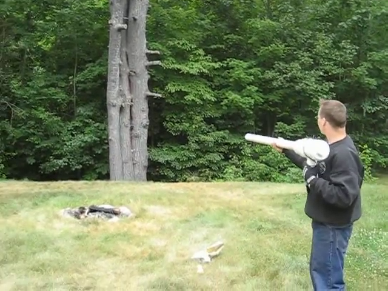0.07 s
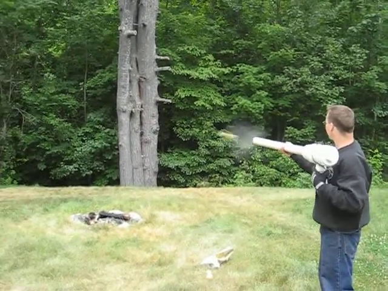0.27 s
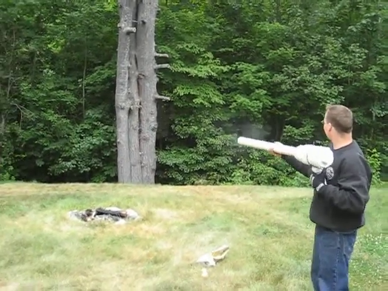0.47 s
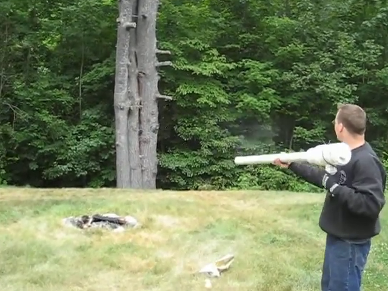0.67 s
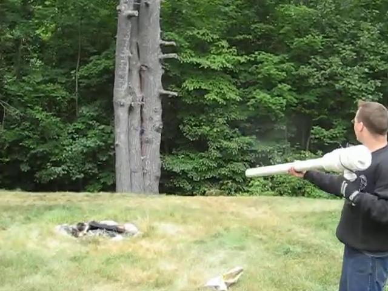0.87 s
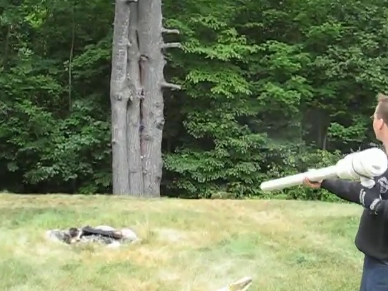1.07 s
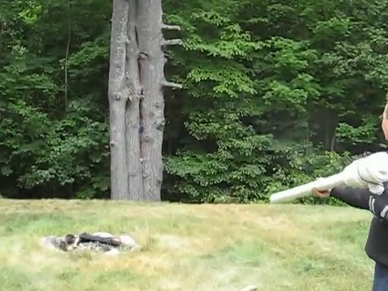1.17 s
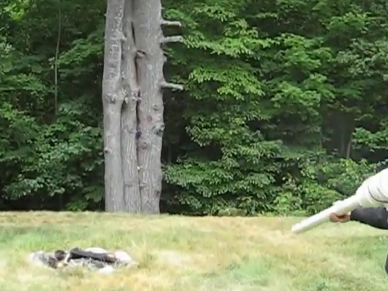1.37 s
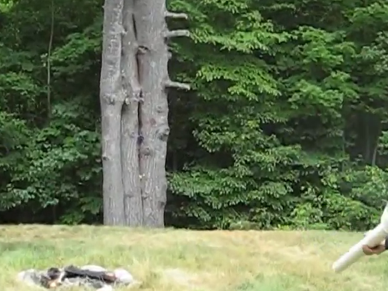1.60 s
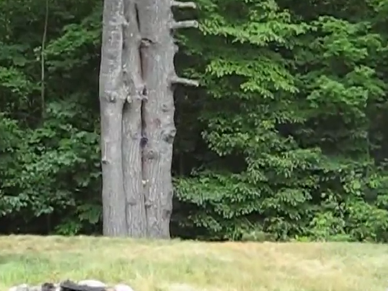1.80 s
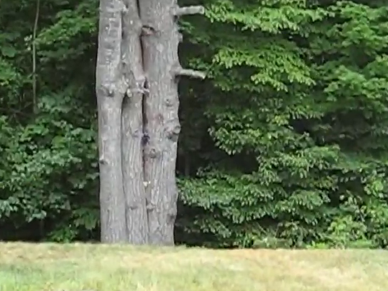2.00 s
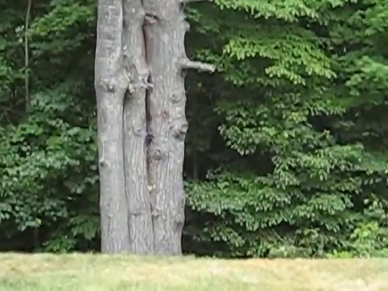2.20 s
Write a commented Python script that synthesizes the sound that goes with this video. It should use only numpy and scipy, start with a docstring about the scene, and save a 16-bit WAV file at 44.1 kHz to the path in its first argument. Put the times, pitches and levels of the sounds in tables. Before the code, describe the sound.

A pipe launcher fires with one sharp pop, then a smack and a rolling echo.

```python
"""Potato launcher at the edge of a wood

A pipe launcher is fired across a lawn, heard on a small camera's microphone over a steady hush.
The igniter snaps, gas hisses out and bursts from the muzzle, and the potato smacks into a tree.
The near trees throw the shot back, then it rolls away through the wood."""
import sys
import numpy as np
from scipy import signal
from scipy.fft import rfft, irfft
from scipy.io import wavfile
from scipy.ndimage import uniform_filter1d

SR = 44100
rng = np.random.default_rng(int(sys.argv[2]) if len(sys.argv) > 2 else 0)


def int16_out(signal):
    """Quantize to a 16-bit WAV file."""
    q = np.round(np.clip(np.atleast_2d(signal).T, -1, 1) * 32767)
    wavfile.write(sys.argv[1], SR, q.astype(np.int16))


N = 99225
T = np.arange(N) / SR
FREQ_HZ = np.fft.rfftfreq(N, 1 / SR)
CAMERA_CUTOFF_HZ = 5840
PIPE_IN_JET_DB, PIPE_IN_ECHO_DB = -3, -9.5


def amp(db):
    """Decibels to gain."""
    return 10 ** (np.asarray(db) / 20)


def unit(x):
    """Scales to rms 1."""
    return x / np.sqrt(np.mean(x ** 2) + 1e-20)


def curve_at(points, hz):
    """Interpolates a table along a log-frequency axis."""
    freq_hz, value = np.transpose(points)
    return np.interp(np.log(hz + 1), np.log(freq_hz + 1), value)


def octaves(hz):
    """Octaves from 1 kHz, held constant below 200 Hz."""
    return np.log2(np.maximum(hz, 200) / 1000)


def colour(spectrum, hz, tilt):
    """Gain of a spectrum tilted in dB per octave, dying away above the camera's band."""
    return amp(curve_at(spectrum, hz) + tilt * octaves(hz)) / (1 + (hz / 6500) ** 16)


def resonance(pitch_hz, width_hz):
    """Gain of one resonant peak across the spectrum."""
    return 1 / (1 + (2 * (FREQ_HZ - pitch_hz) / width_hz) ** 2)


# Resonances of the launcher's pipe: pitch_hz, width_hz, level_db
PIPE_RESONANCES = [(270, 40, 2), (352, 46, -1), (630, 57, -1), (715, 58, -8), (1087, 55, -2),
                   (1300, 33, -4), (1940, 94, -4.5), (2230, 120, -2.5), (2970, 220, 0.5)]
def noise(spectrum, tilt=0, pipe_db=-100):
    """Coloured noise of rms 1, optionally carrying the resonances of the pipe."""
    pipe = 1 + amp(pipe_db) * sum(amp(db) * resonance(hz, width) for hz, width, db in PIPE_RESONANCES)
    return unit(irfft(rfft(rng.standard_normal(N)) * colour(spectrum, FREQ_HZ, tilt) * pipe, N))


def decay(age_s, t60_s):
    """Exponential fall of 60 dB every t60_s."""
    return np.exp(-np.log(1000) * age_s / t60_s)


def envelope(start_s, rise_s, hold_s, t60_s):
    """Quadratic rise, hold and exponential release."""
    t = T - start_s
    return np.clip(t / rise_s, 0, 1) ** 2 * decay(np.maximum(t - rise_s - hold_s, 0), t60_s)


def ring(modes, start_s, rise_s=1 / SR):
    """Damped modes (pitch_hz, level_db, t60_s) set going at one moment."""
    t = np.maximum(T - start_s, 0)
    tones = sum(amp(db) * decay(t, t60_s) * np.sin(2 * np.pi * hz * t) for hz, db, t60_s in modes)
    return np.minimum(t / rise_s, 1) * tones


def crack(spectrum, start_s, tilt, smear_s, size=4096):
    """One coloured pulse of energy 1, its treble trailing by smear_s at the camera's cutoff."""
    hz = np.fft.fftfreq(size, 1 / SR)
    log_gain = np.log(colour(spectrum, abs(hz), tilt) + 1e-4)
    log_minimum_phase = np.conj(signal.hilbert(log_gain))
    phase_lag = np.pi * smear_s * hz * abs(hz) / CAMERA_CUTOFF_HZ
    pulse = np.fft.ifft(np.exp(log_minimum_phase - 1j * phase_lag)).real
    return np.interp(T - start_s, np.arange(size) / SR, pulse / np.linalg.norm(pulse), 0, 0)


# Open air over the lawn, with microphone hiss: freq_hz, level_db
HUSH_SPECTRUM = [(20, -13), (40, 0), (70, -0.5), (160, -1.5), (198, -1), (260, -4.5), (380, -4.5),
                 (500, -9.5), (680, -6), (1200, -9.5), (1600, -14.5), (2900, -17.5), (4500, -18.5),
                 (5500, -24.5)]
# Faint hum behind the hush: pitch_hz, width_hz, level_db
HUM_BANDS = [(196.9, 8, -59)]
# Soft low bumps right on the microphone: start_s, length_s, pitch_hz, level_db
MIC_BUMPS = [(0.136, 0.029, 133, -35), (1.166, 0.13, 50.5, -38.5), (2.1, 0.15, 72.8, -46.5)]
def background():
    """A steady hush and a faint, wavering hum, with a few bumps on the microphone."""
    out = amp(-45) * noise(HUSH_SPECTRUM)
    for hz, width_hz, db in HUM_BANDS:
        out += amp(db) * unit(irfft(rfft(rng.standard_normal(N)) * resonance(hz, width_hz), N))
    for start_s, length_s, hz, db in MIC_BUMPS:
        t = T - start_s
        swell = np.sin(np.pi * np.clip(t / length_s, 0, 1)) ** 2
        out += amp(db) * swell * np.sin(2 * np.pi * hz * t)
    return out


# Rustle just before the shot: freq_hz, level_db
RUSTLE_SPECTRUM = [(40, -14), (100, -2), (170, 1), (250, -9.5), (400, -7.5), (550, -25), (2000, -33)]
def rustle():
    """A soft low rustle grows until the trigger is pressed."""
    swell = envelope(start_s=-0.15, rise_s=0.3, hold_s=0.074, t60_s=0.033)
    return amp(-45.5) * swell * noise(RUSTLE_SPECTRUM)


# Distant echo from deep in the wood: freq_hz, level_db
DEEP_WOOD_SPECTRUM = [(25, -5), (45, -1), (100, -20), (175, -17), (216, -16.5), (251, -19.5), (334, -7.5),
                      (500, -11.5), (622, -2.5), (761, -0.5), (850, -6.5), (1050, -4), (1280, -4.5),
                      (1460, -9.5), (1750, -13.5), (1980, -7.5), (2200, -13.5), (2380, -12.5), (2770, -17),
                      (4000, -24), (5500, -33.5)]
# How long it lingers among the trees: freq_hz, t60_s
DEEP_WOOD_DECAY = [(50, 1.8), (250, 3.2), (700, 2.92), (1300, 2.18), (2000, 1.7), (3000, 1.05), (5500, 1.1)]
def deep_wood():
    """Countless trunks scatter the shot: the echo swells, dulls and rolls away in patches."""
    start_s, rise_s, peak_s = 0.404, 0.11, 0.69
    swell_db_per_s, dulling_db_per_octave_s, patchy_db = 27, 15, 0.95
    wash = noise(DEEP_WOOD_SPECTRUM, pipe_db=PIPE_IN_ECHO_DB)
    hz, t, bands = signal.stft(wash, SR, nperseg=512, noverlap=384)
    hz = hz[:, None]
    before_peak_s, after_peak_s = np.maximum(peak_s - t, 0), np.maximum(t - peak_s, 0)
    patches = uniform_filter1d(rng.standard_normal(bands.shape), size=7, axis=0)
    patches = unit(uniform_filter1d(patches, size=6, axis=1))
    swell_db = before_peak_s * (dulling_db_per_octave_s * np.maximum(octaves(hz), 0) - swell_db_per_s)
    bands *= amp(swell_db + patchy_db * patches) * decay(after_peak_s, curve_at(DEEP_WOOD_DECAY, hz))
    echo = signal.istft(bands, SR, nperseg=512, noverlap=384)[1][:N]
    return amp(-29.5) * np.clip((T - start_s) / rise_s, 0, 1) * echo


# Nearer echo from the tree line across the lawn: freq_hz, level_db
WOOD_EDGE_SPECTRUM = [(35, 9), (60, -18), (90, 3), (135, -5.5), (210, -4), (310, -3.5), (520, -7),
                      (760, 2.5), (1050, -3.5), (1300, 0.5), (1650, -13), (2000, -5), (2600, -8),
                      (3000, -10.5), (4000, -13.5), (5500, -22)]
def wood_edge():
    """The first row of trees returns a dense echo."""
    swell = envelope(start_s=0.3336, rise_s=0.036, hold_s=0.099, t60_s=0.12)
    return amp(-25) * swell * noise(WOOD_EDGE_SPECTRUM, pipe_db=PIPE_IN_ECHO_DB)


# The potato's hit on a tree across the lawn, then its rebound striking something else: start_s, level_db,
# tilt_db_per_octave, knock_db, clack_hz, clack_db
POTATO_STRIKES = [(.4770, 0, 2.5, -11, 3110, -20), (0.5107, -10, -2.2, -34, 1740, -13)]
# The smack as it reaches the microphone: freq_hz, level_db
SMACK_SPECTRUM = [(100, 1.5), (400, 1.5), (700, 7), (1100, 14), (1550, 5), (1900, 5), (2250, 10.5),
                  (2550, -15), (3100, 7.5), (3500, 3.5), (3900, -15), (5100, -6), (6000, -33)]
# Hollow knock of the trunk: pitch_hz, level_db, t60_s
TRUNK_MODES = [(650, -2, 0.041), (788, 3, .028), (1080, -6, 0.016)]
def potato_hits():
    """Each hit is a hard smack with a brief clack, a short wet spray and a knock of the wood."""
    smear_s, clack_t60_s, knock_delay_s = 0.000735, 0.016, 0.0038
    out = np.zeros(N)
    for start_s, db, tilt, knock_db, clack_hz, clack_db in POTATO_STRIKES:
        smack = amp(9.5) * crack(SMACK_SPECTRUM, start_s, tilt, smear_s)
        clack = ring([(clack_hz, clack_db, clack_t60_s)], start_s, rise_s=smear_s)
        spray = amp(-25) * noise(SMACK_SPECTRUM, tilt)
        spray *= envelope(start_s, rise_s=0.00053, hold_s=0, t60_s=0.032)
        knock = ring(TRUNK_MODES, start_s + knock_delay_s, rise_s=0.0025)
        out += amp(db) * (smack + clack + spray) + amp(knock_db) * knock
    return out


# Trigger snaps at the launcher: start_s, level_db
TRIGGER_SNAPS = [(0.2241, -20), (0.2252, 0), (0.2282, -19.5)]
# The snap as the plastic chamber colours it: freq_hz, level_db
CHAMBER_SPECTRUM = [(100, -16.5), (300, -10), (800, -8), (1100, -14.5), (1360, -1), (1620, -6),
                    (1800, -25.5), (2250, -17), (2680, 0), (2980, 4), (3300, -12.5), (3550, -2), (4400, 2),
                    (5000, -3), (5600, -16), (6000, -18)]
# Ring of the igniter and chamber: pitch_hz, level_db, t60_s
IGNITER_MODES = [(1355, -29, 0.03), (2940, -22, 0.011), (4470, -27, 0.013)]
def igniter():
    """The spring trigger snaps and briefly rings the plastic chamber."""
    out = np.zeros(N)
    for start_s, db in TRIGGER_SNAPS:
        snap = amp(11) * crack(CHAMBER_SPECTRUM, start_s, tilt=0, smear_s=0.00063)
        out += amp(db) * (snap + ring(IGNITER_MODES, start_s))
    return out


# Gas surges at the muzzle: start_s, level_db, rise_s, hold_s, t60_s, tilt_db_per_octave
GAS_SURGES = [(0.261, -22, 0.018, .001, .02, 2.2), (0.2809, -14, 0.00039, .002, .022, 0.5),
              (0.283, -21.5, 0.0012, 0.013, 0.012, -0.5), (0.2933, -14, 0.0015, 0.0057, 0.015, -1.1)]
# The gas jet as it reaches the microphone: freq_hz, level_db
JET_SPECTRUM = [(60, -10), (180, -20), (300, -2.5), (480, -8), (630, 1), (860, -5), (1110, 5.5), (1350, -1),
                (2200, 1), (2650, -2), (3100, 1), (4100, -4.5), (5000, -8.5), (6000, -14.5)]
# Slaps off nearby surfaces: start_s, level_db, t60_s, tilt_db_per_octave, ring_hz, ring_db
NEAR_SLAPS = [(0.3095, -24, 0.07, -5, 730, -25), (0.3319, -19, .024, -3.6, 1140, -19),
              (0.361, -27, .045, -2.5, 1310, -21)]
# Low puff that follows the potato out: freq_hz, level_db
PUFF_SPECTRUM = [(40, -7), (90, -3), (170, -17), (220, -3), (280, 1.5), (380, 0.5), (470, -14.5),
                 (600, -12.5), (820, -7.5), (1000, -17), (2000, -38.5)]
# Air in the barrel and chamber, set swinging as the potato leaves: pitch_hz, level_db, t60_s
BOOM_MODES = [(53.5, -21, 0.27), (89.6, -28.5, 0.36), (213.2, -28.5, 0.25), (274, -25.5, .16),
              (354, -28.5, .13)]
def shot():
    """Gas leaks past the potato and bursts out; the pipe's air booms and nearby surfaces slap back."""
    slap_ring_t60_s = 0.025
    jet, slaps = np.zeros((2, N))
    for start_s, db, rise_s, hold_s, t60_s, tilt in GAS_SURGES:
        surge = envelope(start_s, rise_s, hold_s, t60_s)
        jet += amp(db) * surge * noise(JET_SPECTRUM, tilt, PIPE_IN_JET_DB)
    for start_s, db, t60_s, tilt, ring_hz, ring_db in NEAR_SLAPS:
        burst = envelope(start_s, rise_s=0.00077, hold_s=0, t60_s=t60_s)
        slaps += amp(db) * burst * noise(JET_SPECTRUM, tilt, PIPE_IN_JET_DB)
        slaps += ring([(ring_hz, ring_db, slap_ring_t60_s)], start_s)
    puff = envelope(start_s=0.292, rise_s=0.004, hold_s=0.021, t60_s=0.075) * noise(PUFF_SPECTRUM)
    boom = ring(BOOM_MODES, start_s=0.2895, rise_s=0.008)
    return jet + slaps + amp(-24.5) * puff + boom


def scene():
    """Launcher, target tree, echoes and background at one microphone."""
    return (rustle() + igniter() + shot() + potato_hits() + wood_edge() + deep_wood() + background())[None]


def lowpass(x, hz):
    """Steep low-pass."""
    taps = signal.firwin(181, hz, window=("kaiser", 7), fs=SR)
    return signal.oaconvolve(x, taps[None], "same")


def record(dry):
    """The small camera sheds deep bass and treble; peaks clip, leaking a thin tick above its band."""
    low_cut_hz, ceiling, leak_db = 36, 0.66, -11.5
    bass_cut = signal.sosfilt(signal.butter(4, low_cut_hz, "highpass", fs=SR, output="sos"), dry)
    clipped = np.clip(lowpass(bass_cut, CAMERA_CUTOFF_HZ), -ceiling, ceiling)
    in_band = lowpass(clipped, CAMERA_CUTOFF_HZ)
    tick = amp(leak_db) * (clipped - in_band)
    return lowpass(in_band + tick, hz=16600)


dry = scene()
out = record(dry)
int16_out(out)
```